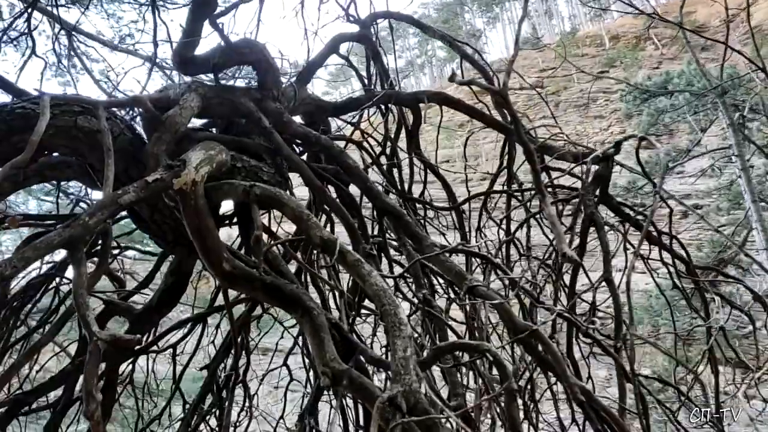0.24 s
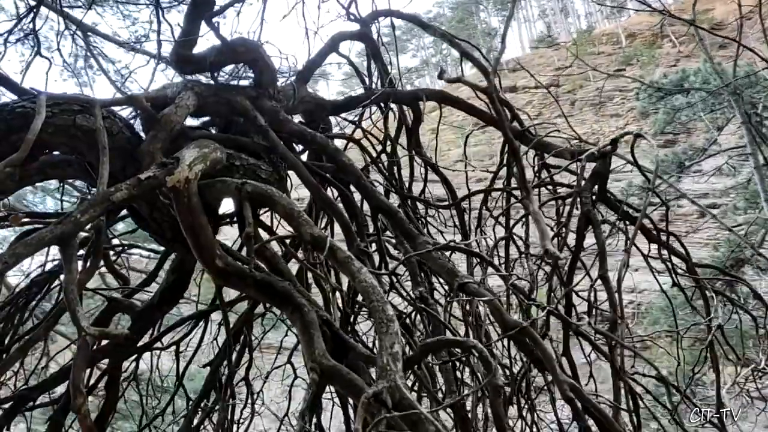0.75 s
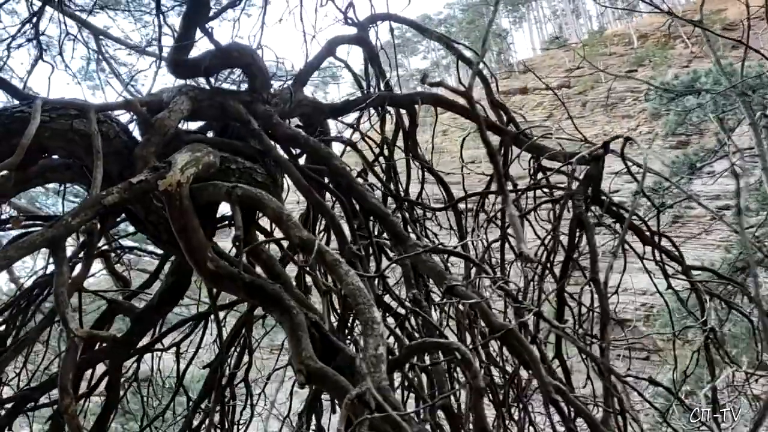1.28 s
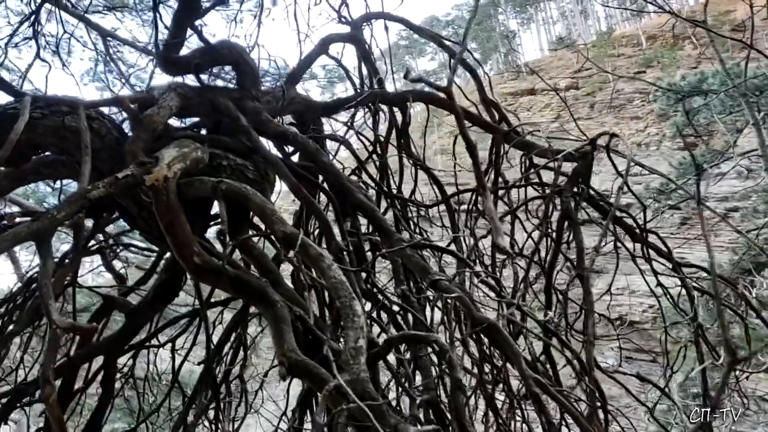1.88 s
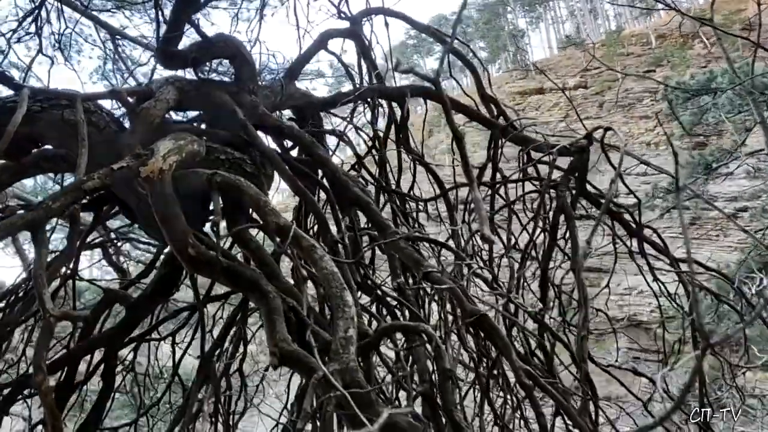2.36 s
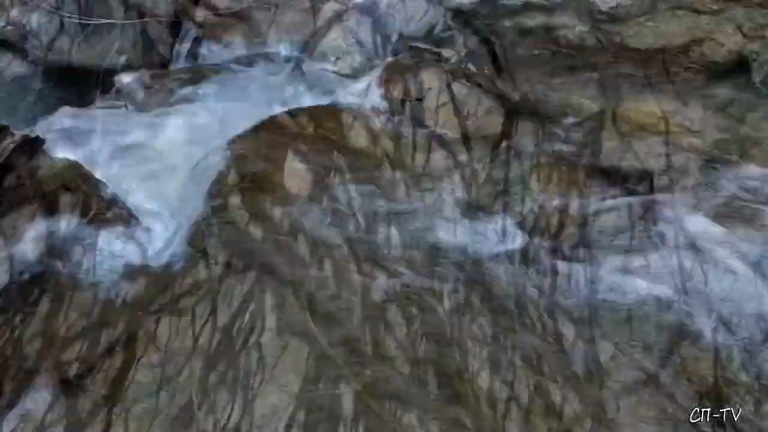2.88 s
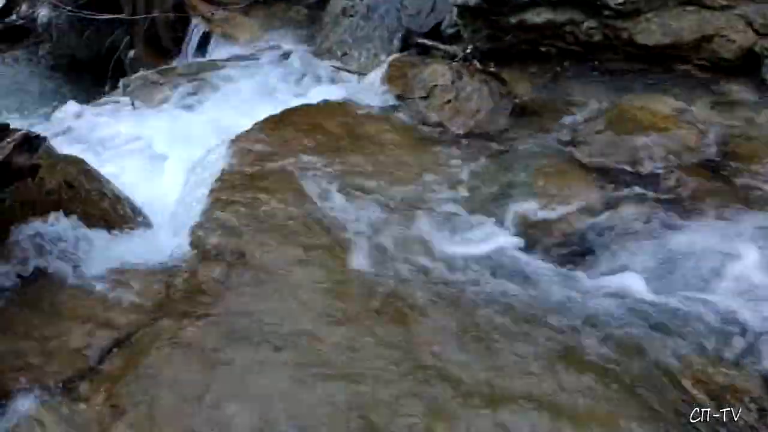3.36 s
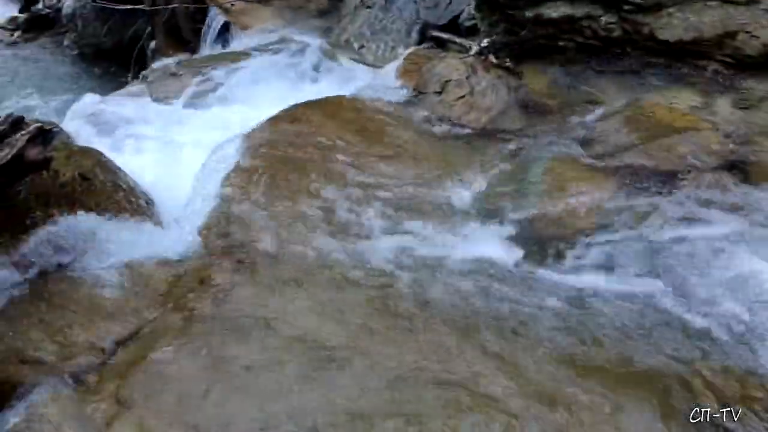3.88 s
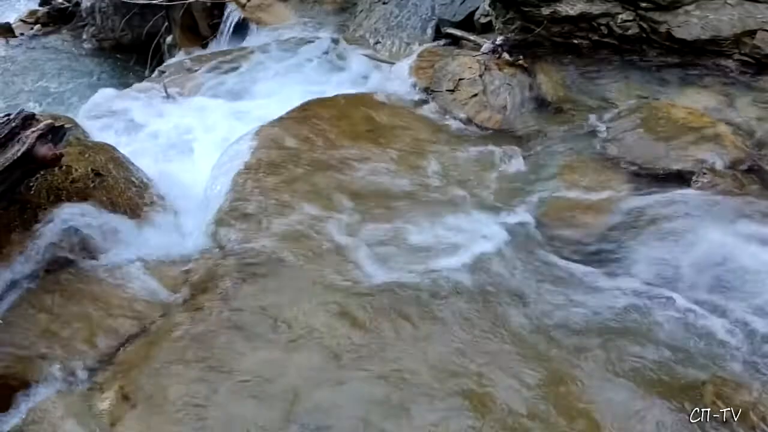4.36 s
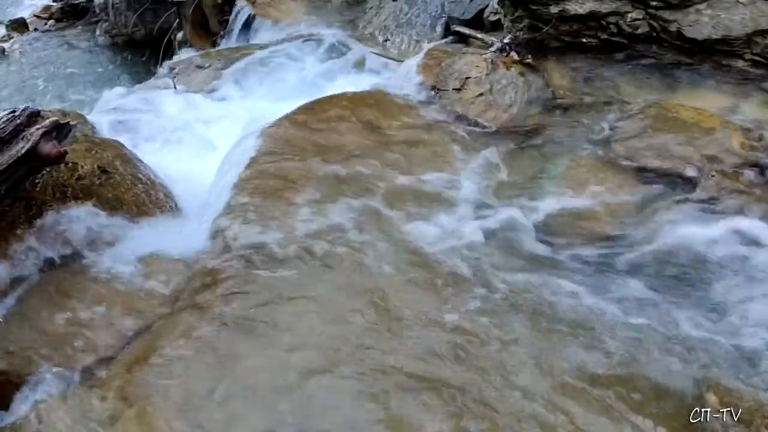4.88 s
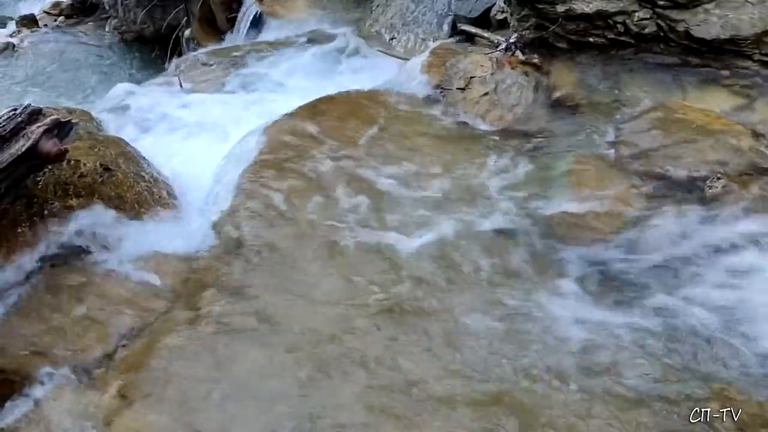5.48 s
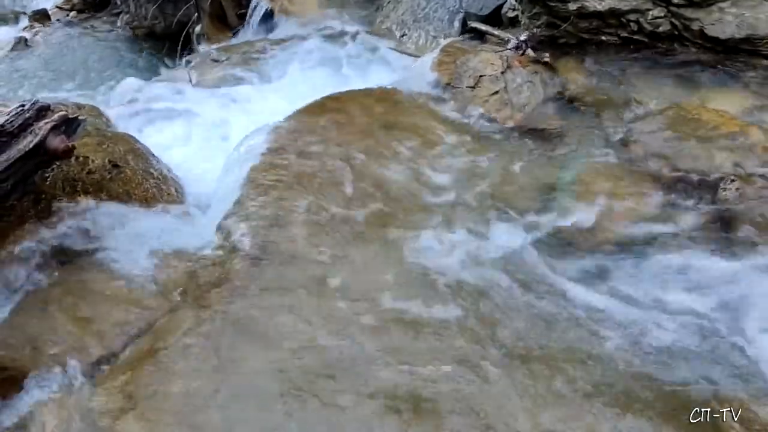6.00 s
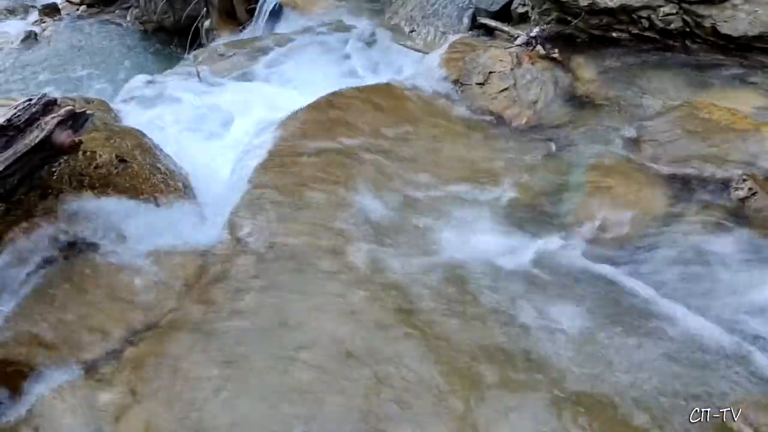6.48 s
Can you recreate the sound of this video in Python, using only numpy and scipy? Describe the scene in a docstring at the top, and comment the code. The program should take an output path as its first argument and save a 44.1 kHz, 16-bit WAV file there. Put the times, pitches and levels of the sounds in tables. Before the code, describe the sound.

A faint, distant outdoor hiss fades into the loud, close rush of a mountain stream over rocks, with wind thumping the microphone.

```python
"""A faint, distant hiss in a wooded gorge, made of shaped noise, fades over into a close mountain stream.
White water, also shaped noise, roars over rock ledges amid ringing bubbles and bursts of spray.
A draught then buffets the microphone as low noise and single thumps; waves slap the rocks as noise bands.
Throughout, resonance of the two small microphone ports near 8 kHz gives the water its bright sizzle."""
import sys
import numpy as np
from scipy import signal
from scipy.fft import rfft, irfft, next_fast_len
from scipy.io import wavfile

SR = 44100
rng = np.random.default_rng(int(sys.argv[2]) if len(sys.argv) > 2 else 0)


def file_out(sig):
    """Save sig as 16-bit WAV at sys.argv[1]."""
    # one column per channel
    cols = np.atleast_2d(sig).T
    # limit, then scale
    lim = np.clip(cols, -1, 1)
    pcm = np.round(lim * 32767).astype(np.int16)
    wavfile.write(sys.argv[1], SR, pcm)


N = 296793
TIME = np.arange(N) / SR


def gain_of(db):
    """Level: an amplitude ratio is ten to the power of dB / 20."""
    return 10 ** (np.asarray(db) / 20)


def evened(x):
    """Normalization: scales a signal to rms 1."""
    return x / np.sqrt(np.mean(x ** 2) + 1e-20)


def follow(rows, t):
    """Linear interpolation: the columns of a curve at the times t."""
    s, *columns = np.transpose(rows)
    return np.array([np.interp(t, s, c) for c in columns])


def read(rows, hz):
    """Interpolation on a logarithmic frequency axis: the columns of a spectrum at hz."""
    f, *columns = np.transpose(rows)
    return np.array([np.interp(np.log(hz + 1), np.log(f + 1), c) for c in columns])


def coloured(x, rows):
    """Linear filtering: multiplies the spectrum of x by a response in dB."""
    size = next_fast_len(N + 4096)
    response = gain_of(read(rows, np.fft.rfftfreq(size, 1 / SR)))
    return irfft(rfft(x, size) * response, size)[:, :N]


def add(mix, s, sound):
    """Superposition: mixes a sound in at s seconds."""
    part = mix[max(round(s * SR), 0):][:len(sound)]
    part += sound[:len(part)]


def drift(shape, *spans):
    """Smoothed random field of rms 1; each span is the width of a lump in steps along its axis."""
    z = np.fft.fftn(rng.standard_normal(shape))
    axes = np.meshgrid(*map(np.fft.fftfreq, shape), indexing="ij")
    for frequency, span in zip(axes, spans):
        z = z * np.exp(-(frequency * span) ** 2)
    return evened(np.fft.ifftn(z).real)


def wander(span_s):
    """Smoothed random process over time, of rms 1, in lumps about span_s long."""
    steps = np.arange(0, N / SR, .002)
    return np.interp(TIME, steps, drift(steps.shape, span_s / steps[1]))


# random flicker of narrow bands of noise, by frequency, before scaling: f/Hz, depth/dB
FLICKER_DEPTH = [(900, 0.37), (1500, 3), (2200, 0.3), (3300, 4), (6300, 4), (7500, 0.5), (9000, 1.5),
                 (11000, 5.5)]
# random broad patches of colour in the noise, before scaling: f/Hz, depth/dB
PATCH_DEPTH = [(300, 2), (900, -0.2), (1500, 2), (2200, 1), (4500, 1), (6300, -0.5), (8000, 0.7),
               (12000, 2.5)]


def rush(spectrum, likeness, patchiness, patch_s, patch_hz, flicker, flicker_s, flicker_hz, veer, veer_s):
    """Incoherent summation: countless splashes merge into uneven noise whose left-right correlation veers."""
    noise = rng.standard_normal((2, N)) * np.sqrt(SR / 2)  # unit power per Hz
    hz, t, (a, b) = signal.stft(noise, SR, nperseg=1024, noverlap=768)
    bin_hz, frame_s = hz[1], t[1]

    # veering on the arctanh scale keeps the correlation within -1 and 1
    mean_likeness = np.arctanh(np.clip(read(likeness, hz), -.99, .99)).T
    same = np.tanh(mean_likeness + veer * drift(a.shape, patch_hz / bin_hz, veer_s / frame_s))
    ports = np.array([a, same * a + np.sqrt(1 - same ** 2) * b])

    patches = patchiness * read(PATCH_DEPTH, hz).T
    patches = patches * drift(a.shape, patch_hz / bin_hz, patch_s / frame_s)
    flickers = flicker * read(FLICKER_DEPTH, hz).T
    flickers = flickers * drift(a.shape, flicker_hz / bin_hz, flicker_s / frame_s)
    unevenness = gain_of(patches + flickers)
    # each frequency keeps its mean power
    unevenness = unevenness / np.sqrt(np.mean(unevenness ** 2, axis=1, keepdims=True))

    ports = ports * gain_of(read(spectrum, hz)[:, :, None]) * unevenness
    return signal.istft(ports, SR, nperseg=1024, noverlap=768)[1][:, :N]


# distant hiss before fade and ports, power per Hz: f/Hz, left level/dB, right level/dB
FAR_SPECTRUM = [(30, -66, -73), (139, -68, -71.5), (198, -66, -71.5), (290, -63, -67), (410, -66, -71),
                (600, -64.5, -67.5), (1130, -67, -68), (2170, -71.5, -69.8), (3250, -75.8, -75),
                (4500, -80.2, -79.5), (6000, -81, -76.3), (7000, -88.3, -80.5), (7800, -88, -85.5),
                (9100, -85, -83), (10000, -87.5, -88), (10500, -97, -93), (13000, -86, -86),
                (15000, -89.5, -88)]
# its left-right likeness before veering: f/Hz, correlation/1
FAR_LIKENESS = [(200, 0.96), (650, 0.69), (1000, 0.046), (1550, -0.24), (2150, 0.39), (2900, -0.35),
                (3900, 0.3), (4900, -0.09), (6500, -0.056)]


def distant_hiss():
    """Spectral shaping: the distant hiss is a weak noise with partly correlated ports."""
    return rush(FAR_SPECTRUM, FAR_LIKENESS, patchiness=0.41, patch_s=0.019, patch_hz=600,
                flicker=0.78, flicker_s=0.065, flicker_hz=130, veer=0.11, veer_s=.06)


# sheets of spray thrown up and moments of slackening: t/s, left lift level/dB, right lift level/dB
SPRAY_SURGES = [(2.83, 3, 3), (3.272, 1.5, 2), (3.476, 3.2, 1), (3.625, -3, 5), (3.759, 6, 3),
                (4.06, -6, -2), (4.17, 4, 7), (4.452, -1, 2), (4.63, 5, 2), (4.7, -5, 1), (5.369, 1.5, 4),
                (5.455, 1.5, 3), (5.652, 2, 1), (5.72, 1, -3), (5.9, 4, 0), (6.053, 5, 3.3),
                (6.178, 7.5, 3.8), (6.281, 4, 4), (6.607, 0, 5.3)]
SURGE_WIDTH_S = 0.012
SPRAY_DB, SWAY_DB, SWAY_S = -0.12, 0.14, 0.032  # mean level, rms sway and its span


def spray_db():
    """Amplitude modulation: a partly shared random sway, and a brief swell or lull for each surge."""
    shared = wander(SWAY_S)
    level = SPRAY_DB + SWAY_DB * evened(np.array([shared + wander(SWAY_S) for port in range(2)]))
    for s, *lift_db in SPRAY_SURGES:
        level = level + np.outer(lift_db, np.exp(-((TIME - s) / SURGE_WIDTH_S) ** 2))
    return level


# white water before later gains and ports, power per Hz: f/Hz, left level/dB, right level/dB
STREAM_SPECTRUM = [(30, -53, -59), (275, -56, -54), (427, -61, -64), (530, -55.5, -58.5), (765, -60, -61.5),
                   (950, -56, -60), (1200, -59.7, -61), (1510, -61.3, -59.5), (1800, -63.5, -61.5),
                   (2240, -63.5, -62), (2880, -70.5, -68.5), (3580, -73.3, -71), (4500, -73, -70),
                   (5200, -70.5, -72), (15000, -71, -70)]
# likeness before veering, its sign swinging as water reaches one port first: f/Hz, correlation/1
STREAM_LIKENESS = [(100, 0.51), (350, 0.43), (580, 0.99), (950, 0.28), (1250, -0.55), (1560, -0.83),
                   (1850, -0.065), (2150, 0.9), (2400, 0.74), (2850, -0.17), (3500, 0.31), (4200, -0.15),
                   (4550, 0.4), (5200, 0.34), (6350, -0.47), (7400, -0.023)]


def white_water():
    """Band splitting: the ledges' roar keeps its level; the treble spray above it surges and sways."""
    water = rush(STREAM_SPECTRUM, STREAM_LIKENESS, patchiness=0.82, patch_s=0.024, patch_hz=590,
                 flicker=0.97, flicker_s=0.057, flicker_hz=120, veer=0.47, veer_s=0.046)
    roar = signal.sosfiltfilt(signal.butter(6, 6900, fs=SR, output="sos"), water)
    treble = water - roar
    return roar + treble * gain_of(spray_db())


PORT_LAG_S = .00041


def bubbles(per_s, low_hz, high_hz, cycles, rise, spread_db, level_db, lifetimes):
    """Damped resonance: trapped air rings briefly, rises in pitch and reaches one port first."""
    out = np.zeros((2, N))
    for when, size, strength, side, damping in rng.random((int(per_s * N / SR), 5)):
        hz = low_hz * (high_hz / low_hz) ** size
        life_s = cycles * (.5 + damping) / hz
        age = np.arange(int(lifetimes * life_s * SR) + 2) / (life_s * SR)  # in lifetimes
        phase = 2 * np.pi * hz * life_s * (age + rise * age ** 2 / 2)
        ring = np.sin(phase) * np.exp(-age) * (1 - np.exp(-8 * age))
        ring = ring * gain_of(spread_db * min(-np.log(1 - strength), 4))
        first = int(side > .5)
        add(out[first], when * N / SR, ring)
        add(out[1 - first], when * N / SR + PORT_LAG_S, 1.07 * ring)
    return gain_of(level_db) * evened(out)


def spray(per_s, burst_s, spread_db, level_db):
    """Shot noise: flung drops land at random, left or right, in short decaying bursts of fizz."""
    size = gain_of(spread_db * np.minimum(rng.exponential(1, (2, N)), 4))
    landings = size * (rng.random((2, N)) < per_s / SR)
    power = signal.lfilter([1], [1, -np.exp(-2 / (burst_s * SR))], landings ** 2)
    fizz = np.sqrt(power) * rng.standard_normal((2, N))
    # f/Hz, level/dB
    colour = [(500, -15), (1600, -15), (3000, -5.5), (9000, -5.0), (11000, -6), (15000, -5.5)]
    return gain_of(level_db) * evened(coloured(fizz, colour))


# light draught between gusts, before fade and wind gain: left level/dB, right level/dB
BREEZE_LEVEL = (-45, -33.5)
# puffs, much harder on the right port, before wind gain:
# start t/s, length t/s, right level/dB, left level/dB
PUFFS = [(2.498, .12, -31, -36), (2.729, 0.021, -20, -39), (2.766, 0.1, -17.5, -34),
         (2.878, 0.029, -23, -38), (2.961, 0.024, -20.5, -38), (3.001, 0.043, -19, -30),
         (3.085, 0.024, -20, -30), (3.128, 0.04, -17.5, -27), (3.178, 0.032, -21, -34),
         (3.334, 0.092, -24.5, -40), (3.47, 0.051, -20, -26), (3.54, 0.11, -24, -36),
         (3.687, 0.054, -18.5, -41), (3.75, 0.063, -21, -38), (3.838, 0.097, -21, -36),
         (3.955, 0.04, -16.5, -42), (4.022, 0.023, -18, -40), (4.138, 0.037, -27, -34),
         (4.19, 0.045, -25, -30), (4.258, 0.062, -21, -36), (4.344, 0.068, -22.5, -32),
         (4.427, 0.03, -20.5, -28), (4.713, 0.25, -25.5, -42), (4.972, 0.11, -22, -29.5),
         (5.02, 0.023, -17, -36), (5.131, 0.075, -18, -33), (5.239, 0.036, -19, -35),
         (5.302, 0.039, -19, -32), (5.521, 0.2, -19, -29.5), (5.72, 0.079, -15.5, -28),
         (5.831, 0.026, -15.5, -29), (5.874, 0.3, -17.5, -34), (5.905, 0.032, -13, -35),
         (6.165, 0.068, -14, -36), (6.246, 0.14, -19, -29), (6.343, 0.044, -12.5, -34),
         (6.436, 0.027, -18, -28), (6.484, 0.042, -15, -20), (6.532, 0.09, -23, -28),
         (6.633, 0.033, -12.5, -30), (6.678, .05, -18, -27)]
GUST_ATTACK_S, GUST_RELEASE_S = 0.0043, 0.01


def airflow(presence):
    """Energy addition: a light breeze by the stream, and puffs that rise fast, hold and break off."""
    power = np.outer(gain_of(BREEZE_LEVEL), presence) ** 2
    t = TIME[:SR]
    for start, length, right_db, left_db in PUFFS:
        attack = np.minimum(t / GUST_ATTACK_S, 1)
        puff = attack * np.exp(-np.maximum(t - length, 0) / GUST_RELEASE_S)
        for port, db in enumerate((left_db, right_db)):
            add(power[port], start, (gain_of(db) * puff) ** 2)
    return np.sqrt(power)


# relative pressure spectrum of the eddies: f/Hz, level/dB
EDDY_SPECTRUM = [(8, -18), (30, 1.5), (70, 3), (118, -1.5), (158, 3.5), (210, 1.3), (280, -2.5),
                 (420, -8.5), (600, -18), (1000, -28), (2500, -69)]


def wind(flow, flutter_db, flutter_s, level_db, fray_db):
    """Turbulence: eddies tumble over each port separately; strong gusts fray into smaller eddies."""
    pressure = evened(coloured(rng.standard_normal((2, N)), EDDY_SPECTRUM))
    # f/Hz, level/dB
    small_colour = [(150, -29), (330, -19.0), (480, -7.0), (900, -21.5), (2500, -52)]
    small = evened(coloured(rng.standard_normal((2, N)), small_colour))
    flutter = [wander(flutter_s) for port in range(2)]
    force = flow * evened(gain_of(flutter_db * np.tanh(flutter))) * gain_of(level_db)
    # the power above 1 makes small eddies grow faster than the flow
    return force * pressure + gain_of(fray_db) * force ** 1.65 * small


# strongest single eddies, levels before the common gain: t/s, level/dB, f/Hz
EDDIES = [(2.741, -10, 220), (2.835, -2.5, 332), (2.968, -4.5, 300), (3.035, -5, 260), (3.482, -8, 278),
          (3.798, -7, 220), (4.047, -16, 220), (4.919, -3.5, 247), (5.168, -2, 198), (5.32, -7, 270),
          (5.557, -6, 260), (5.748, -0.5, 340), (5.764, -11, 200), (5.787, 0, 240), (5.855, -5, 220),
          (5.923, -5, 180), (5.998, -9, 400), (6.181, 0, 260), (6.199, -11, 380), (6.229, -13, 200),
          (6.259, -6, 260), (6.367, -10, 400), (6.384, -5, 169), (6.65, -16, 290), (6.728, -4, 280)]


def buffets(cycles, level_db):
    """Pressure pulse: a strong eddy sucks at the right port and lets go, the shorter the higher."""
    out = np.zeros((2, N))
    t = np.arange(-600, 600) / SR
    skews = rng.uniform(-0.66, 0.32, len(EDDIES))  # phase in radians
    for (s, db, hz), skew in zip(EDDIES, skews):
        thump = -np.cos(2 * np.pi * hz * t + skew) * np.exp(-(t * hz / cycles) ** 2)
        add(out[1], s + t[0], gain_of(db + level_db) * thump)
    return out


# waves that slap the rocks, levels before the common gain:
# t/s, level/dB, centre f/Hz, rise t/s, left minus right level/dB
WAVE_SLAPS = [(2.837, -4, 613, 0.0051, -13), (3.405, -5, 925, 0.0039, 2), (3.533, -6, 2590, .003, 1),
              (3.823, -13, 2100, 0.0025, 0), (3.921, -18, 1900, 0.0018, -1), (4.042, -14, 2110, 0.0023, 0),
              (4.937, -8, 4800, 0.0043, 6), (5.131, 2, 1950, 0.0028, 0), (5.301, -10, 1500, .004, 7),
              (5.371, -3, 626, 0.008, 0), (5.904, -9, 4930, 0.0053, 2), (5.975, -7, 800, .01, 11),
              (6.174, -4, 750, 0.0122, -2), (6.305, -10, 810, .01, 2), (6.388, -10, 2100, 0.0021, 2),
              (6.44, -8, 850, .01, 2), (6.5772, -0.5, 2200, 0.0034, 2), (6.608, -11, 4800, 0.0037, -4)]


def slaps(width_octaves, level_db):
    """Band-limited noise: a wave slaps a rock in a short cloud of bubbles of like size."""
    out = np.zeros((2, N))
    t = np.arange(4096) / SR
    octave = np.log2(np.fft.rfftfreq(len(t), 1 / SR) + 1)
    for s, db, hz, rise_s, pan_db in WAVE_SLAPS:
        band = np.exp(-((octave - np.log2(hz)) / width_octaves) ** 2)
        cloud = irfft(rfft(rng.standard_normal(len(t))) * band)
        slap = evened(cloud) * t / rise_s * np.exp(1 - t / rise_s)
        for port, side_db in enumerate((pan_db / 2, -pan_db / 2)):
            add(out[port], s - rise_s / 2, gain_of(db + side_db + level_db) * slap)
    return out


# fade from one place to the other: t/s, distant hiss gain/1, stream gain/1
CROSSFADE = [(2.22, 0.6, 0), (2.29, 0.5, 0.13), (2.38, 0.65, 0.22), (2.47, 0.6, 0.43), (2.72, 0.7, 0.66),
             (2.84, 0.78, 0.81), (3.25, 0, 1)]


def scene():
    """Cross-fading: the distant hiss gives way to the stream, and the draught sets in with it."""
    far_gain, stream_gain = np.maximum(follow(CROSSFADE, TIME), 0)
    far = distant_hiss()
    water = gain_of(-0.45) * white_water()
    gurgle = bubbles(per_s=200, low_hz=378.3, high_hz=1112, cycles=6.2, rise=0.06,
                     spread_db=3.0, level_db=-37, lifetimes=5)
    babble = bubbles(per_s=170, low_hz=1890, high_hz=6440, cycles=23, rise=0.0225,
                     spread_db=3.0, level_db=-50, lifetimes=5)
    tinkle = bubbles(per_s=110, low_hz=3104, high_hz=6990, cycles=91, rise=0.0046,
                     spread_db=0.5, level_db=-42.5, lifetimes=4)
    fizz = spray(per_s=150, burst_s=0.0028, spread_db=2.0, level_db=-41.5)
    draught = wind(airflow(stream_gain), flutter_db=1.5, flutter_s=0.012, level_db=-1.3, fray_db=-3.0)
    thumps = buffets(cycles=0.57, level_db=-4.0)
    waves = slaps(width_octaves=0.48, level_db=-28.0)
    stream = water + gurgle + babble + tinkle + fizz + waves
    return far_gain * far + stream_gain * stream + draught + thumps


# response of the microphone ports: f/Hz, left level/dB, right level/dB
PORT_RESPONSE = [(135, -2, -2.5), (167, 1.5, 1), (5190, 0, -0.5), (6890, 7, 8.5), (7670, 12, 17),
                 (8200, 9.5, 13), (8420, 15, 9.5), (9145, 9.5, 6), (9490, -1.5, -12), (9650, -3.5, -3),
                 (11230, -13, -13.5), (15300, -19.5, -19.5)]
EDGE_HZ = 15600


def record(dry):
    """Cavity resonance and band limiting: the ports colour the sound, then a low-pass removes the top."""
    edge = signal.firwin(511, EDGE_HZ, window=("kaiser", 9), fs=SR)
    return signal.oaconvolve(coloured(dry, PORT_RESPONSE), edge[None], "same")


dry = scene()
out = record(dry)
file_out(out)
```